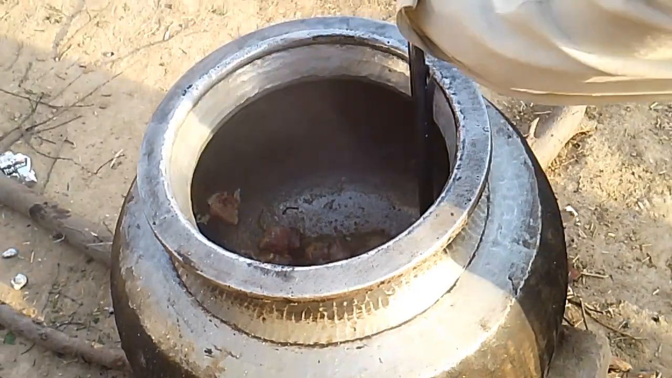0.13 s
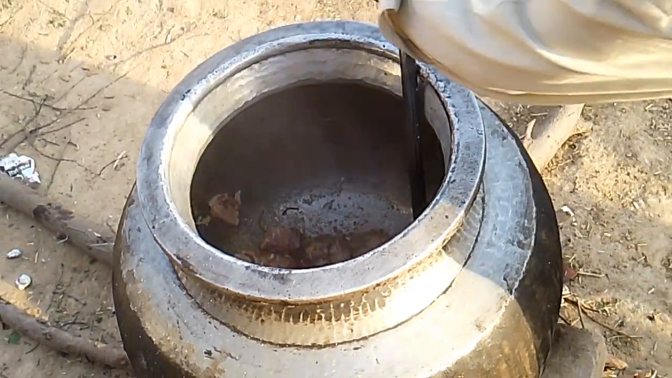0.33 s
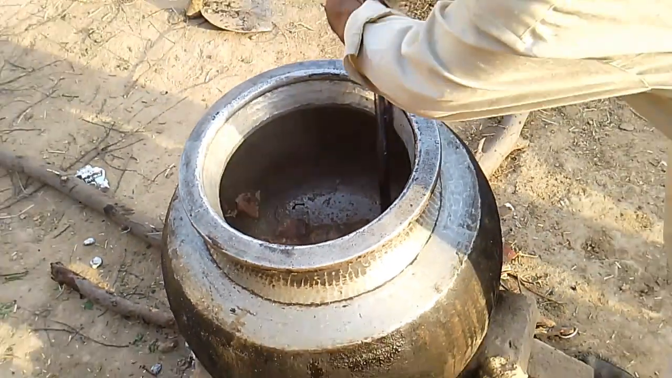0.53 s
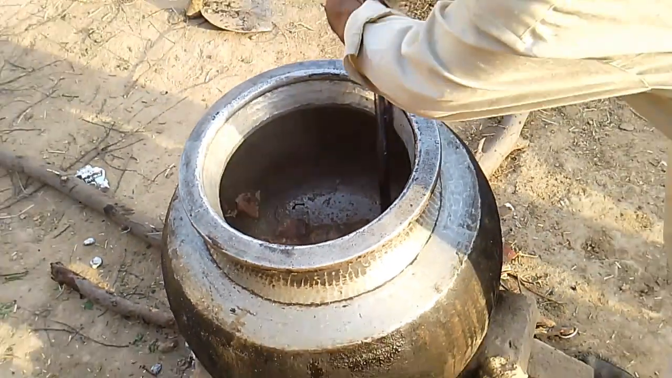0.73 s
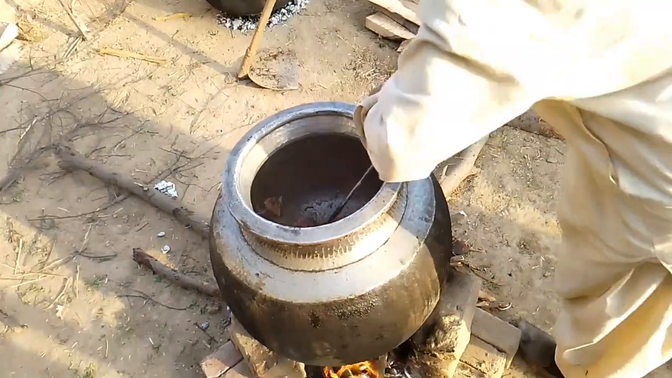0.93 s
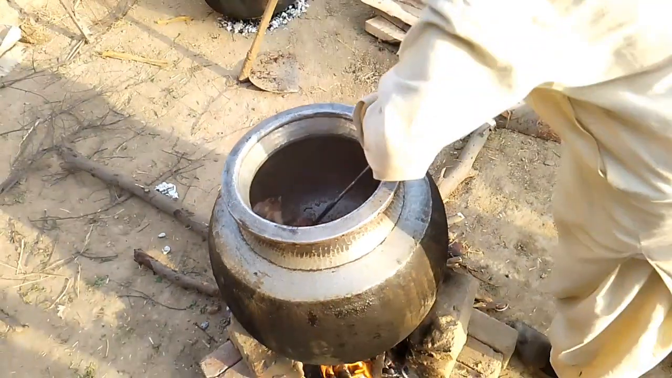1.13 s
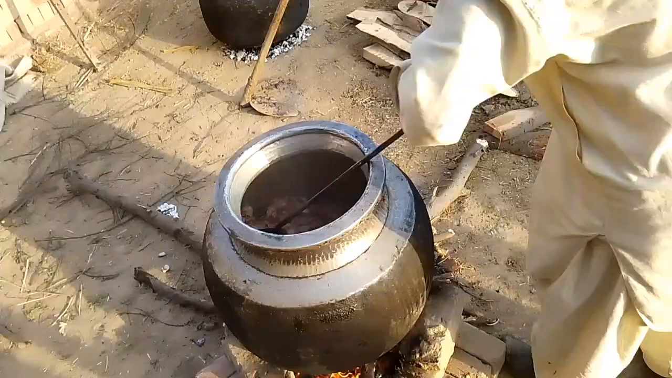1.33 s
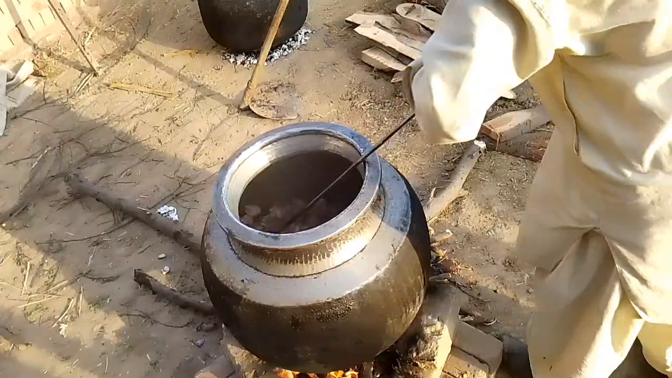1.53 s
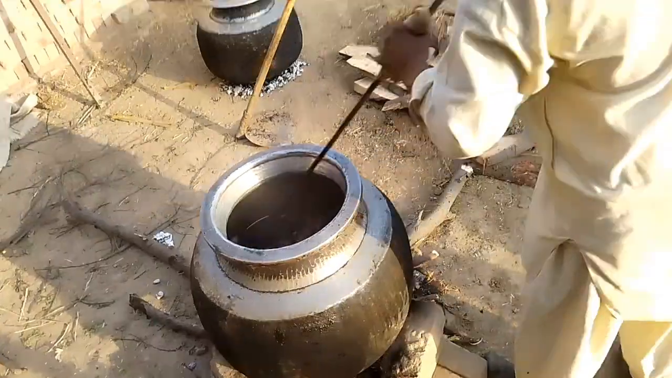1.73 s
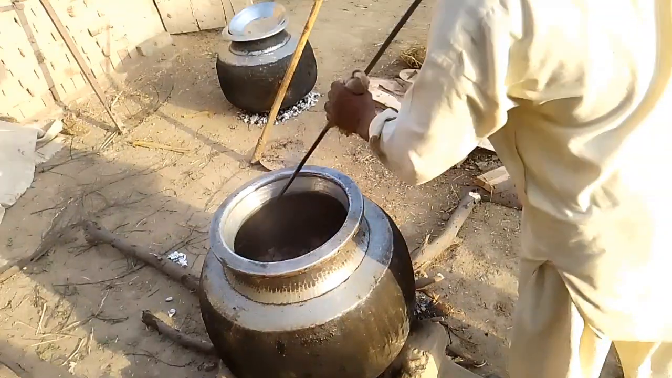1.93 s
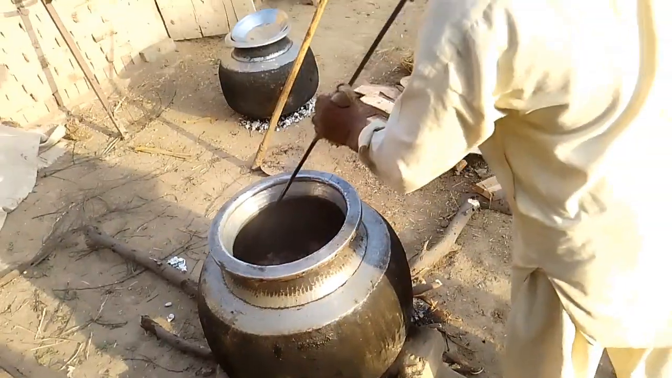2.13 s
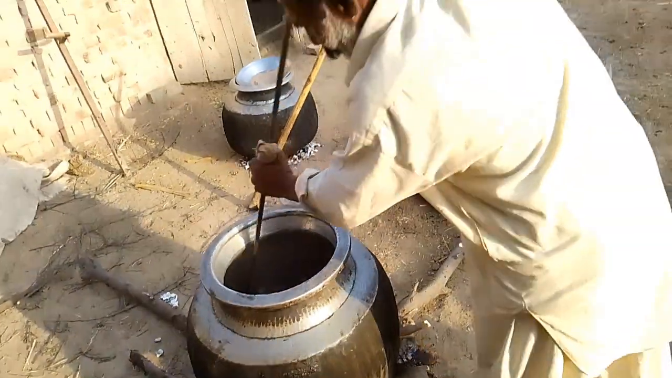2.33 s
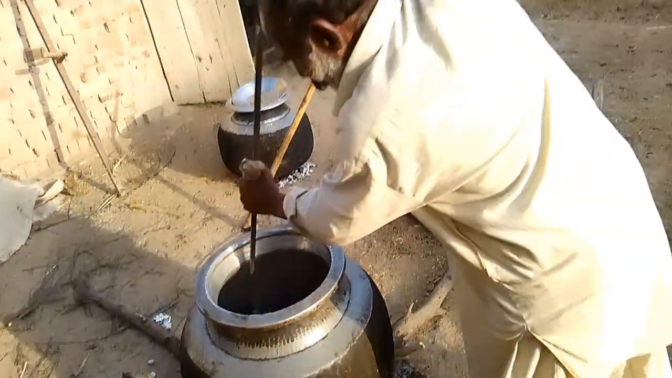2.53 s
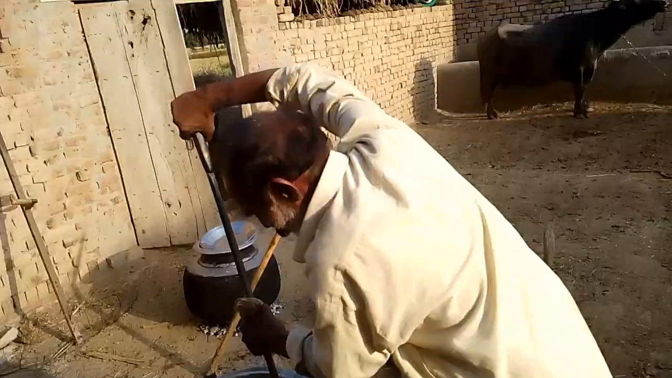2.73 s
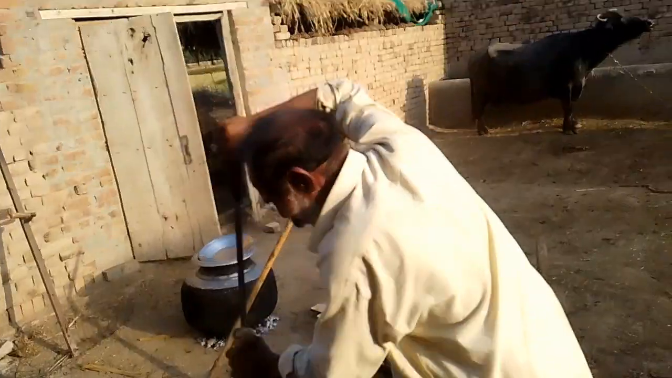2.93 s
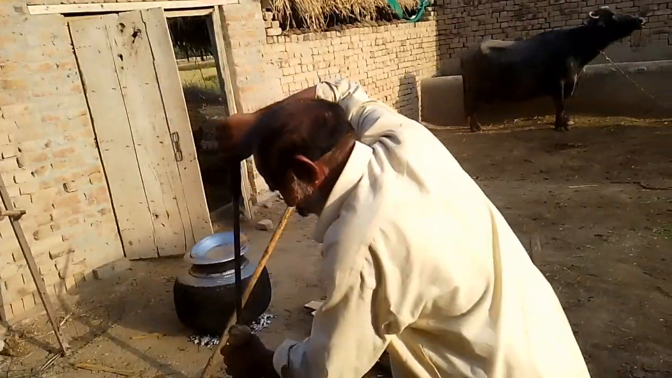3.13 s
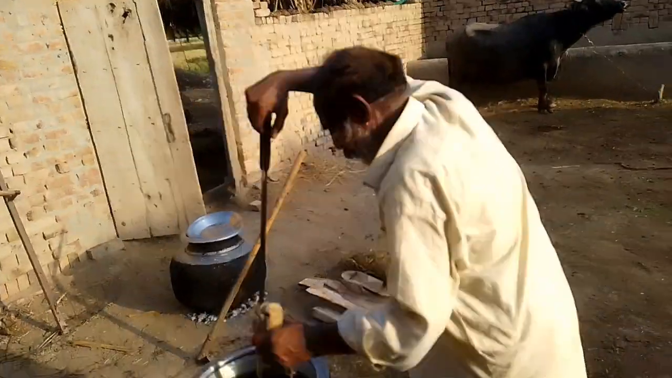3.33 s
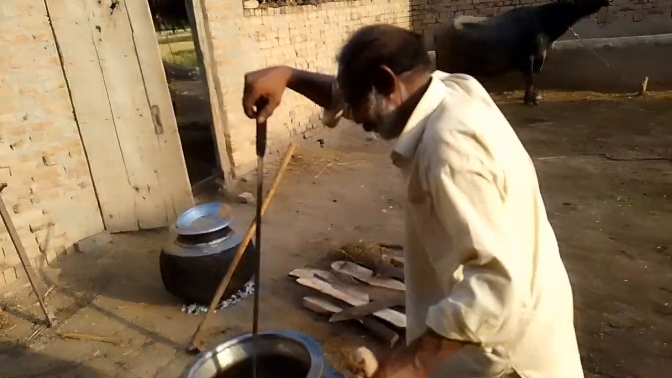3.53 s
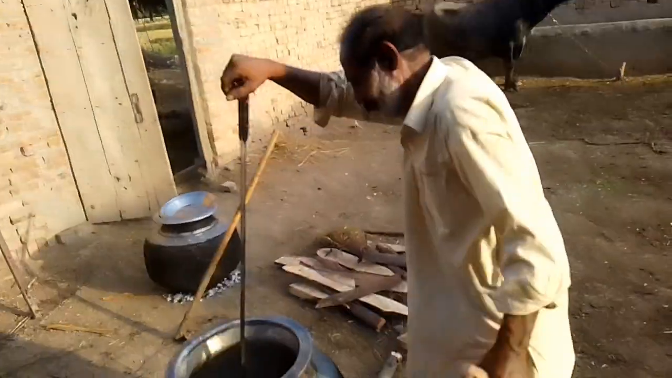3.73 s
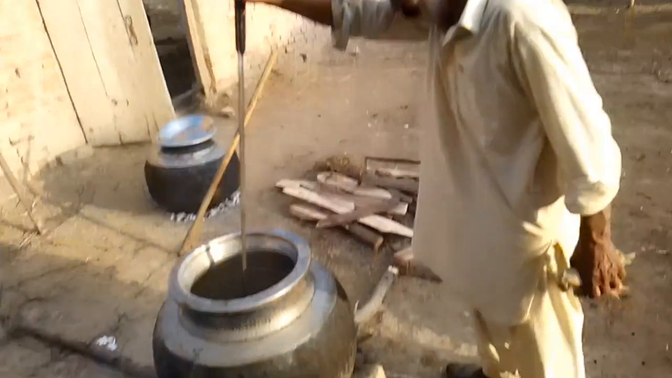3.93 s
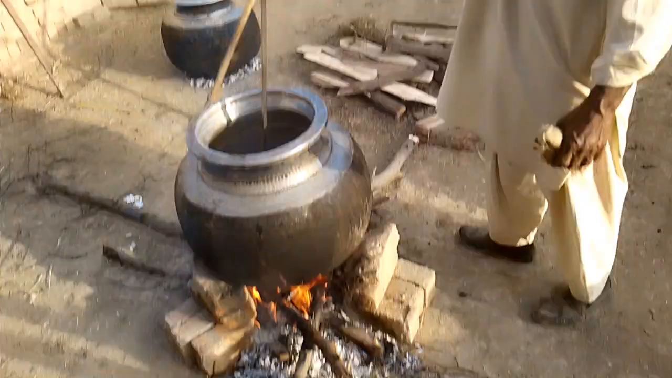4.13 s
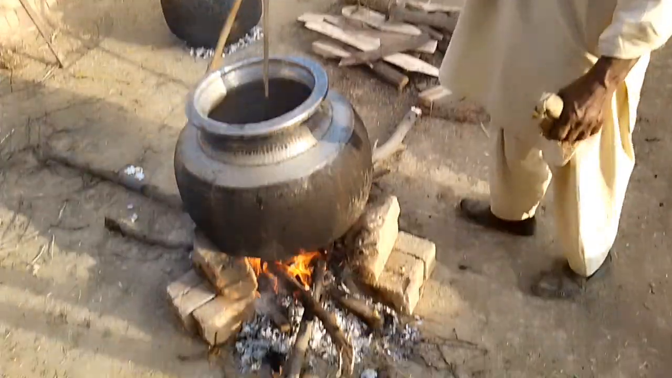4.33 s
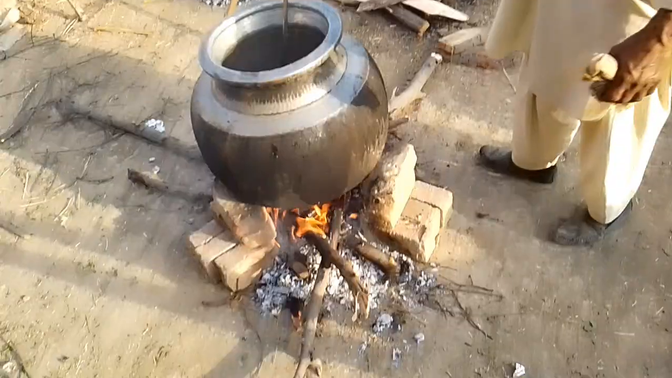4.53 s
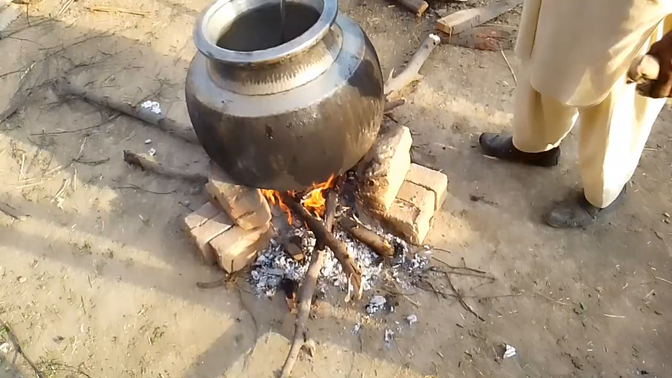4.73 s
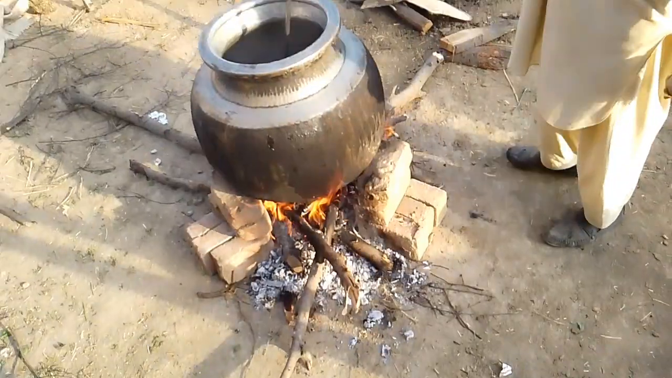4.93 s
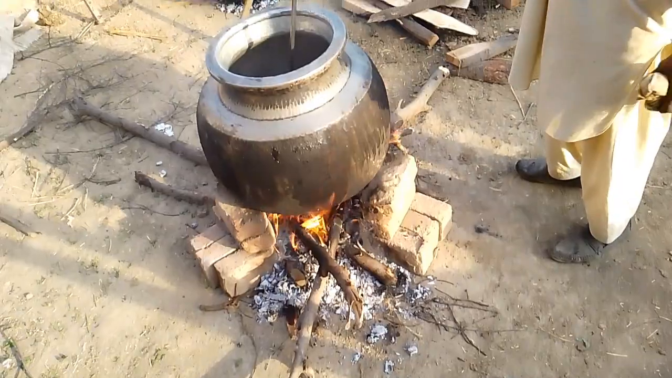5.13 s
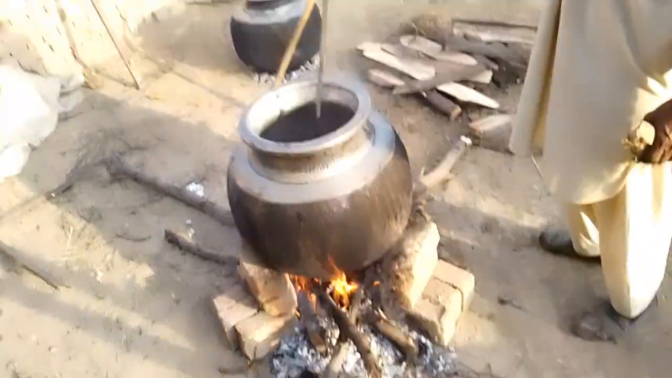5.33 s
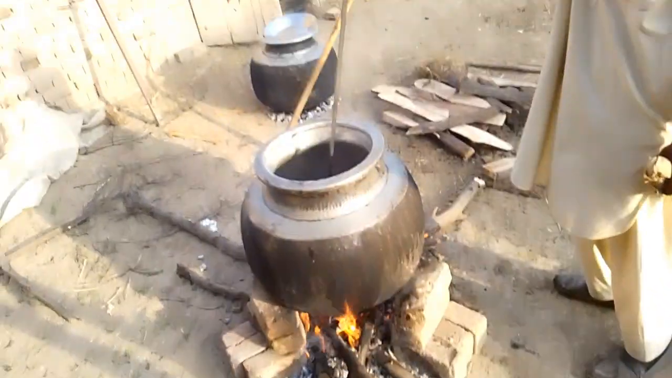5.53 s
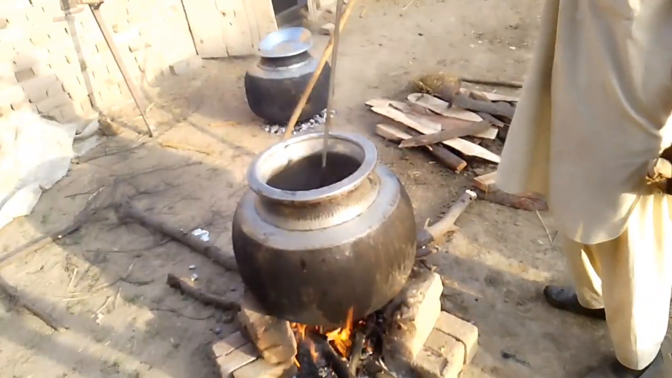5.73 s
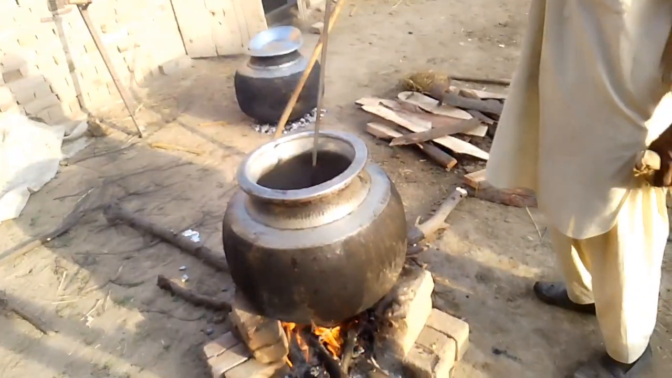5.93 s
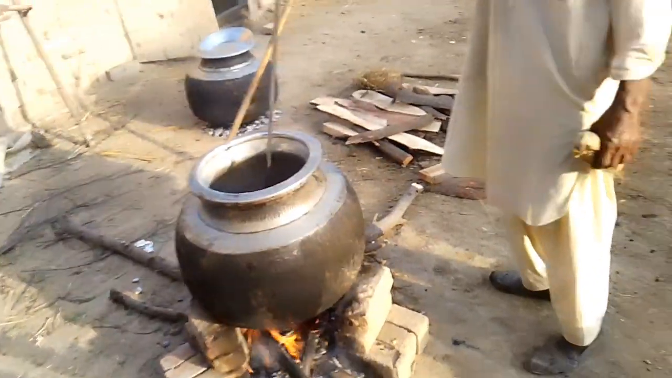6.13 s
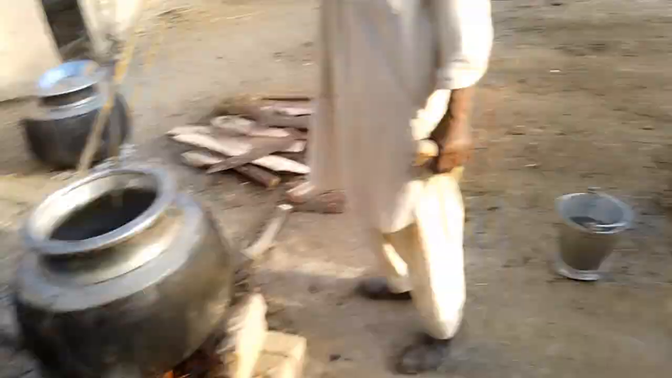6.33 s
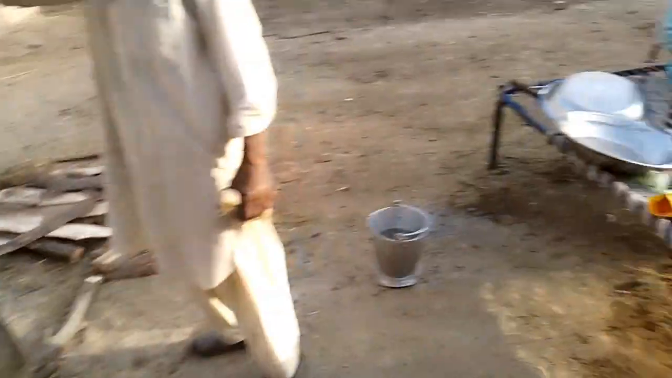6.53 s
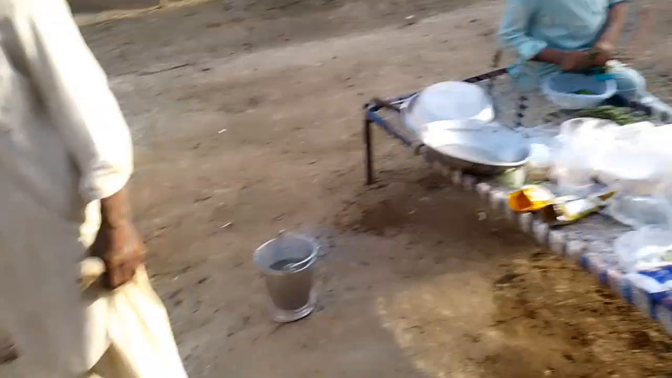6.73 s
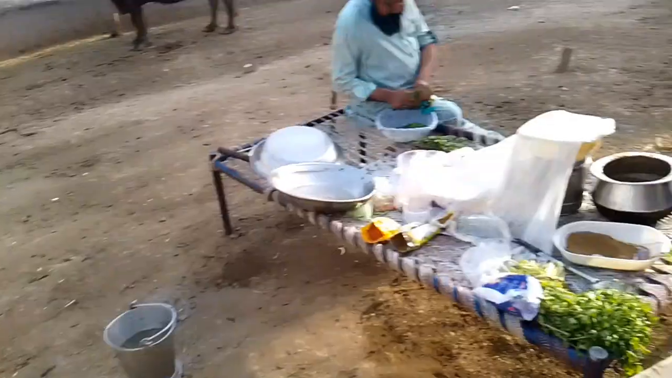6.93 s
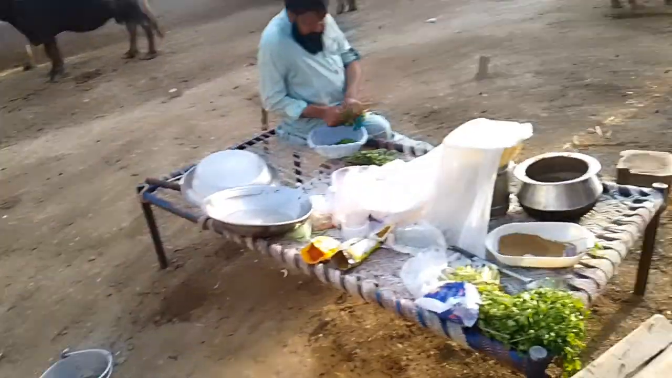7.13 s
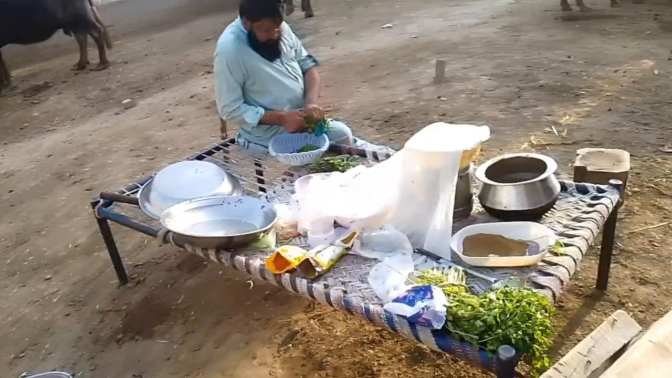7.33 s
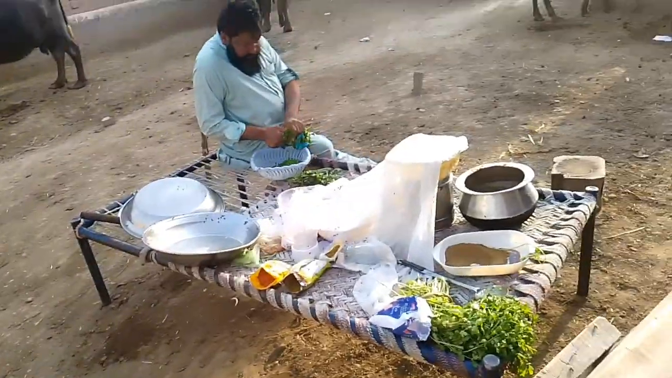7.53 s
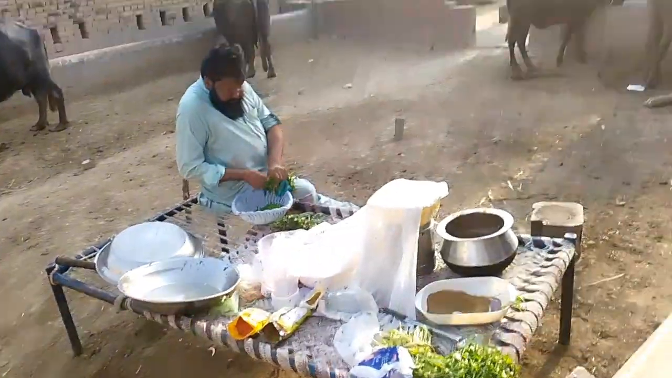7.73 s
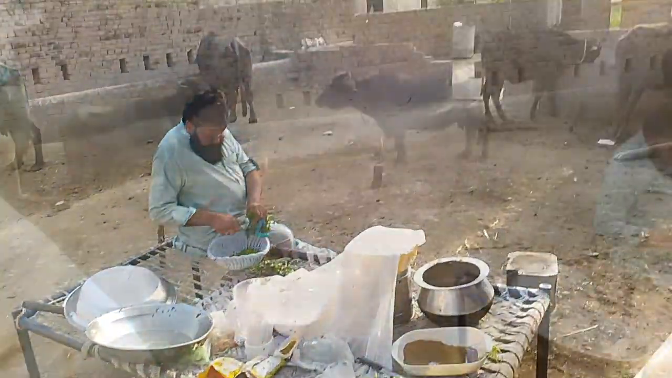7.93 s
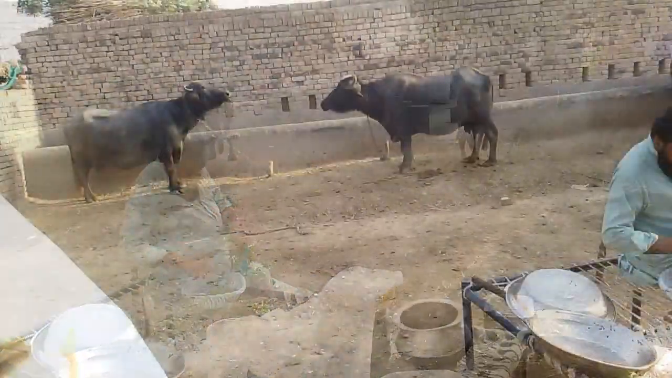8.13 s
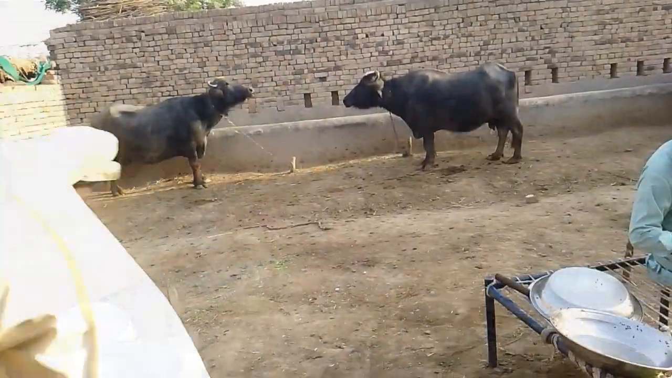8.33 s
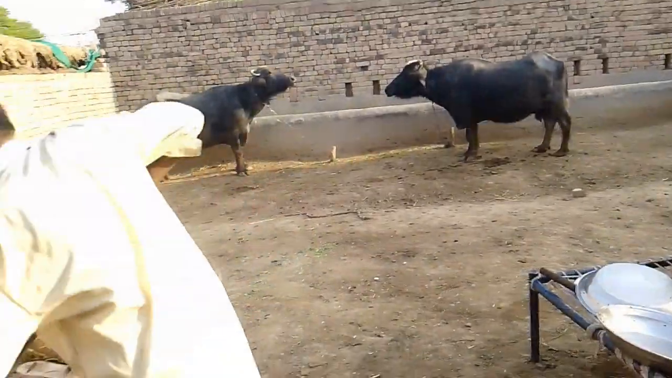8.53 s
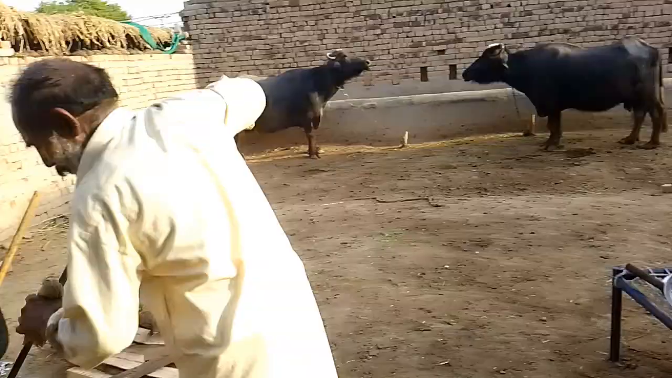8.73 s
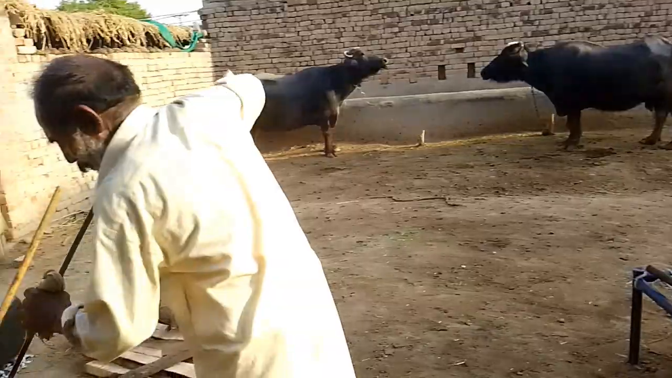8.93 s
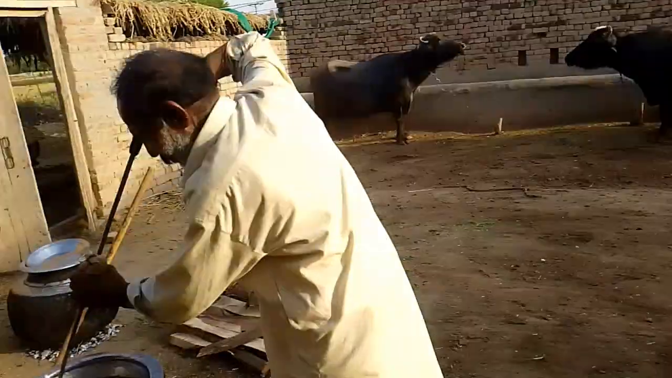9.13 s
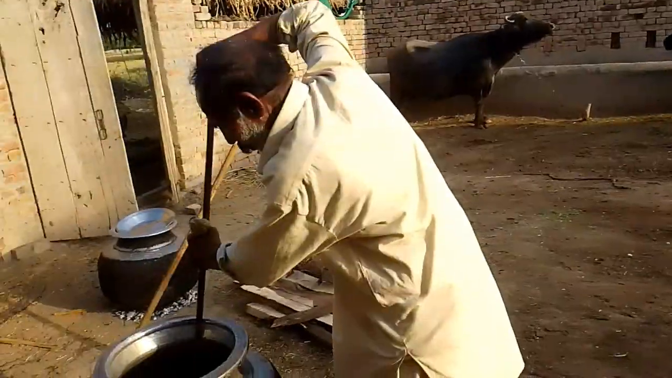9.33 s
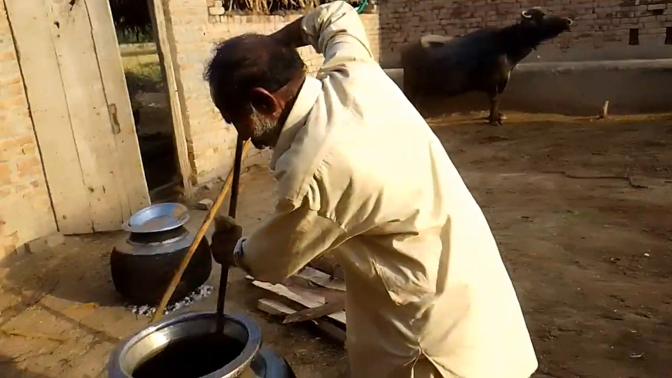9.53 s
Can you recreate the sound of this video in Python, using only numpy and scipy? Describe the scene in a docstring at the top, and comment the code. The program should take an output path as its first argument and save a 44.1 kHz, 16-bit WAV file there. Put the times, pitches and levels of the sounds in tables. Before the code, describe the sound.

A heavy metal pot of curry sizzles over a fire in an open yard, heard close, its frying hiss changing colour as the microphone moves. From about 0.6 to 1.4 seconds an iron ladle taps rapidly and scrapes the inside wall with gritty rasps and a hollow hum. A faint crow caws at 1.6. At 1.9 comes the loudest, bright ringing clank, followed by scraping; duller knocks and a squeaky scrape run around 2.5 to 3, fading by 3.5. Then mostly softer sizzle, with tiny fat spits and a low murmur. Distant hoarse caws come at 6.2 and 7.1, soft footfalls near 6.8 and 7.5, a sharper spit at 7.55 and a barely audible dove purr at 7.65. From 7.5 everything fades almost to silence; at 8.7 the sizzle returns abruptly, with ladle knocks and scrapes from 9, strongest around 9.3 to 9.5.

```python
"""A yard with a fire: in a big metal pot, curry sizzles while an iron ladle knocks and scrapes.
Knocks are sums of decaying modes with noise bursts; scraping is flickering noise, chirps and modal ringing.
The sizzle is noise recoloured as the listener wanders round the pot; noise makes spits, footfalls and murmur.
A crow caws far off by shaped overtones, and a dove purrs once on a sine.
The sound fades almost to silence, then returns at once."""
import sys
import numpy as np
from scipy import signal
from scipy.fft import rfft, irfft, next_fast_len
from scipy.io import wavfile
from scipy.ndimage import uniform_filter1d, map_coordinates

SR = 44100
rng = np.random.default_rng(int(sys.argv[2]) if len(sys.argv) > 2 else 0)


def dump(signal):
    """Clip the signal to [-1, 1] and save it as 16-bit WAV at the path in sys.argv[1]."""
    limited = np.clip(np.atleast_2d(signal).T, -1, 1)
    pcm = np.round(limited * 32767).astype(np.int16)
    wavfile.write(sys.argv[1], SR, pcm)


N = 422037

# ladle knocks: start_s, level_db, thud_db, lowest_mode_db, best_rung_pitch_hz, low_modes_db, damping (1 = free)
KNOCKS = [(0.567, -21, -31.5, -32.5, 1370, -5, 2.7), (0.746, -22, -51, -52, 1340, -1.5, 0.92),
          (0.773, -19, -59, -56, 1000, -8, 2.6), (0.864, -22, -40, -53, 1100, -7, 1.7),
          (0.948, -21.5, -42, -38, 1485, 1, 0.38), (1.038, -28, -55, -37, 1400, 14, 0.69),
          (1.079, -21, -59, -34.5, 980, -1, 2), (1.139, -20.5, -55, -34.5, 2150, -13, 1.1),
          (1.21, -20.5, -46, -34.5, 1390, 0, 1.1), (1.279, -24, -56, -37.5, 990, -3.5, 0.8),
          (1.36, -23, -64, -42, 1390, -5, 0.9), (1.871, -6, -60, -40, 1610, -5, 1.34),
          (1.924, -12, -59, -33.5, 1370, 0, 0.78), (1.954, -22, -59, -35.5, 1160, -6, 0.82),
          (2.098, -30, -63, -37.5, 2560, -18, 0.83), (2.474, -28.5, -45, -47, 1980, -24, 0.35),
          (2.559, -23.5, -42, -58, 2900, -17, 2.8), (2.597, -23, -31, -58, 1130, -13, 1.9),
          (2.65, -21, -34, -43, 1960, -22, 2.6), (2.688, -29, -39.5, -42.5, 1980, -18, 2),
          (2.961, -27, -42, -57, 1980, -22.5, 0.67), (8.995, -17.5, -54.5, -50, 2170, -16, 2.5),
          (9.172, -21, -51, -71.5, 2600, -13, 1.3), (9.23, -32, -61.5, -70, 1500, -19, 1.2),
          (9.273, -10, -63, -38, 1610, -7, 1.03), (9.316, -18, -46.5, -44, 1470, -6, 0.85),
          (9.447, -13, -62, -38, 1470, -36, 1.2), (9.478, -18, -49, -46.5, 1510, -30, 0.95),
          (9.551, -21.5, -58, -61, 1500, -24, 0.98)]
# ringing modes of the pot: pitch_hz, level_db, free_t60_s
POT_MODES = [(692, -1, 0.16), (1032, 9, 0.43), (1090, -13.5, 0.52), (1119, 7.5, 0.47), (1410, 0.5, 0.31),
             (1500, -5, .25), (1567, -0.5, 0.11), (1640, 2, 0.22), (1820, -16.5, 0.16), (2030, -12, 0.24),
             (1978, -6.5, 0.39), (2137, -5.5, 0.5), (2317, 1, 0.12), (2440, -5.5, 0.44), (2560, -3.5, 0.38),
             (2620, -13.5, 0.26), (2706, 0, .6), (2776, -12, 0.72), (2945, 1, 0.18), (3220, -7, 0.65),
             (3580, -2, 0.59), (3650, -10, .5), (3930, -23, 0.48), (4000, -22, 0.45), (4160, -3, 0.3),
             (4650, -23, 0.52), (5160, -31.5, .4), (5070, -19, .3)]
# loaded bottom of the pot, lowest mode first: pitch_hz, level_db, t60_s
BOTTOM_MODES = [(122.5, 0.5, 0.32), (235, 9, 0.042), (450.6, -5.5, 0.14)]
# ladle strokes, one list for each run of scraping: time_s, scrape_db, dull_rasp_db, low_grind_db
STROKES = [
    [(0.6, -41, -43, -55), (0.72, -48.5, -52, -67), (0.908, -30.5, -38.5, -45.5), (1.028, -30, -39, -51),
     (1.09, -30, -38, -53.5), (1.216, -31, -43.5, -45), (1.348, -64, -54, -64), (1.5, -39.5, -69, -67)],
    [(1.88, -36.5, -47, -77), (2.032, -35.5, -62, -63), (2.19, -41.5, -68, -64), (2.27, -45, -64, -59)],
    [(2.4, -44, -62, -49.5), (2.472, -40.5, -62, -59), (2.574, -35.5, -57, -50), (2.674, -26, -47, -67),
     (2.792, -41, -66, -50), (2.928, -35.5, -55, -58.5), (3.124, -51, -63, -52.5),
     (3.288, -58.5, -55.5, -51.5), (3.4, -46.5, -77, -79)],
    [(9.0, -41.5, -55, -70), (9.196, -32, -58, -64), (9.294, -46, -47, -52), (9.438, -34.5, -43, -52),
     (9.57, -35.5, -47.5, -50)],
]
# spectrum of iron on the wall: frequency_hz, density_db (per Hz)
SCRAPE_SPECTRUM = [(240, -23), (400, 14), (519, -2.5), (749, 2), (809, 5), (1020, -2), (1240, -5),
                   (1450, -25), (1760, -10), (4350, -8.5), (5730, -27), (9210, -10), (15500, -52)]
# spectrum of the low grind through the wall: frequency_hz, density_db (per Hz)
GRIND_SPECTRUM = [(53, -54.5), (90, -33), (118, -15), (161, -11), (226, -5), (300, -5.5), (333, 0.5),
                  (364, -20), (407, -18), (460, -7.5), (511, -47), (620, -14), (810, -56), (1360, -120)]
# level of the sizzle as the listener moves: time_s, body_db, fizz_db
SIZZLE_LEVELS = [(0.0, -45.5, -49.5), (0.55, -44, -50), (1.1, -41.5, -46.5), (1.6, -43, -47),
                 (2.0, -40.5, -53.5), (2.4, -46.5, -51), (2.85, -45, -47), (3.0, -42, -55.5),
                 (3.35, -45, -52.5), (3.78, -47.5, -53), (4.6, -50.5, -58), (5.2, -51, -55),
                 (5.8, -48, -57), (6.39, -48.5, -53), (6.57, -53, -56.5), (6.94, -50, -57.5),
                 (7.35, -49, -52.5), (7.91, -44, -47), (8.06, -44, -46.5), (8.2, -48.5, -54),
                 (8.45, -45.5, -47), (8.67, -49, -53.5), (8.68, -44.5, -46), (8.97, -42.5, -47.5)]
# colour of the sizzle at each listening place: time_s, list of (frequency_hz, density_db (per Hz))
SIZZLE_COLOURS = [(0.3, [(290, -51), (500, -36), (586, -55), (696, 3), (863, -2), (1510, 1), (1700, -8),
                  (1880, -7), (2010, -8), (2500, -2), (2840, -2), (4840, 3), (7780, -11.5), (9930, -10),
                  (15500, -24)]), (2.2, [(290, -46), (500, -21), (603, -55), (666, -45), (696, -26),
                  (1030, -9), (1330, -22), (1770, 3.5), (2260, -15), (2610, -6), (3430, -7.5), (4440, -4.5),
                  (5670, -7.5), (8720, -7), (15500, -18)]), (3.6, [(290, -26), (500, -19), (781, -47),
                  (901, -17), (1030, -12), (1410, -18), (1470, -17), (1580, -13), (1820, 0.5),
                  (3380, -11.5), (3630, -8), (6270, -20), (8480, -20.5), (11000, -33.5), (15500, -29.5)]),
                  (5.2, [(290, -56), (500, -27), (803, -18), (914, -37), (1010, -8), (1240, -16), (1600, 3),
                  (2010, -3), (2290, 3.5), (2800, -1.5), (3960, -0.5), (7030, -17), (8720, -13.5),
                  (11300, -28), (15500, -27.5)]), (6.8, [(290, -34), (500, -15.5), (968, -11.5), (1100, -7),
                  (1370, -14), (1990, -7.5), (2390, -10.5), (2890, -4.5), (4020, -4.5), (5130, -6),
                  (6180, -4), (7670, -9), (9790, -6.5), (11500, -17), (15500, -11.5)]), (7.8, [(290, -60),
                  (500, -26), (803, -10), (982, -27), (1120, -10), (1620, -9), (1770, -6), (2970, -2),
                  (3790, -6), (4130, -1), (5670, -12), (6270, -8), (8980, -4), (10400, -18),
                  (15500, -24.5)]), (8.8, [(290, -38), (500, -25), (577, -33), (648, -25), (716, -22),
                  (851, -14.5), (1240, -17.5), (1580, -6), (3100, -10), (4130, -6), (4840, -11.5),
                  (6930, -15), (8980, -9.5), (12000, -20), (15500, -17)])]
# resonances of the air in the pot's neck: centre_hz, width_hz, lift_db
NECK_RESONANCES = [(1630, 110, 4.5), (2313, 520, 5), (3800, 220, 1.5)]
# fat spits: start_s, level_db
SPITS = [(3.3034, -47), (3.3583, -51), (3.3942, -52), (3.4705, -48), (4.2234, -45), (5.1564, -47),
         (5.3198, -44), (7.5552, -34)]
# soft footfalls: start_s, level_db
FOOTFALLS = [(6.817, -40), (6.884, -47.5), (7.463, -49)]
# crow caws: start_s, length_s, level_db, lower_over_upper_beak_resonance_db
CAWS = [(1.6, 0.2, -43.5, 3.5), (6.187, 0.28, -46, 0), (7.129, 0.24, -42.5, -5.5)]
# weak fixed resonances of the crow's beak: centre_hz, width_hz, level_db
BEAK_RESONANCES = [(960, 200, -24), (3900, 400, -16)]
# dove throbs: start_s, peak_db
PURR_THROBS = [(7.644, -46.5), (7.668, -52), (7.69, -49), (7.715, -58), (7.745, -49)]
# spectrum of the far murmur of fire and yard: frequency_hz, density_db (per Hz)
MURMUR_SPECTRUM = [(12, -44), (20, -14), (22, -24), (76, -28), (169, -7), (728, -11.5), (812, -5.5),
                   (905, -13.5), (1010, -10.5), (1230, -17.5), (1500, -3), (1950, -24), (3300, -120)]
# decay of the yard's echo: frequency_hz, t60_s
ECHO_DECAY = [(200, 1), (2000, 0.33), (10000, 0.18)]

# knocks: parts of a blow in dB relative to its level, decay times in s
CLANK_DB, CLANK_T60_S = -13.5, 0.053
CRACK_DB, CRACK_T60_S = -15, 0.091
SMACK_DB, SMACK_T60_S = -14, 0.032
SMACK_GROWS = 0.4  # dB more of deep smack for each dB of blow
HIGH_DB, HIGH_DB_PER_OCTAVE = -13.5, 57  # high modes of a blow pitched at 1400 Hz; brighter blows ring them more
ATTACK_S, ATTACK_SOFTENS = 0.00035, 0.63  # rise of a -3 dB blow; lighter blows rise slower (dB of time per dB)
THUD_DEEPENS = 0.38  # heavier thuds stir the lowest bottom mode more (dB per dB)

# the pot's lowest mode
BELLY_HZ, BELLY_T60_S, BELLY_RISE_S = 365, 1.8, 0.013  # t60 at damping 1; time to rise to 95 %
BELLY_RUBBED_DB = -18  # what scraping feeds it
BELLY_STEADY_DB, BELLY_WAVERS = -40, 0.4  # below this level the hum dips, more for each dB it has sunk
REST_S, REST_DB = 3.54, -68  # the ladle comes to rest and stills the hum
RETURN_S, BELLY_RETURN_DB = 8.675, -55  # when full level returns, and the hum set there

HISS_DB, TREBLE_DB, CHIRP_DB = -6, -18.5, -10.5  # over the scrape level
RING_DB = -8  # the pot's modes under the scrape

# crow
CAW_PULSES_PER_S, RASP = 71, 0.17
CAW_ATTACK_S, CAW_RELEASE_S, CAW_EDGE_DB, CAW_TIRES_DB_PER_S = 0.081, 0.1, -15.5, 23
BEAK_SHUT_HZ, BEAK_OPEN_HZ, BEAK_SAG_HZ_PER_S, LOWER_FADES_DB_PER_S = 1800, 1946, 600, 43

SCUFF_DB = -2  # grit under a footfall
FADE_S, BEFORE_RETURN_DB = 7.54, 2  # start of the linear fade; gain ahead of it
LOW_CUT_HZ, TOP_HZ = 93, 15650


def amp(db):
    """Decibel law: amplitude is ten to the power dB / 20."""
    return 10 ** (np.asarray(db) / 20)


def unit(x):
    """Normalisation to an rms of one."""
    return x / np.sqrt(np.mean(x ** 2) + 1e-20)


def along(points, hz):
    """Interpolation of (frequency, value) points on a logarithmic frequency axis."""
    f, v = np.transpose(points)
    return np.interp(np.log(hz + 1), np.log(f + 1), v)


def curves(tables, silent_db=None):
    """Linear interpolation of each column in time; given silent_db, the gaps between tables drop to it."""
    rows = []
    for table in tables:
        if silent_db is None:
            rows += table
            continue
        silence = (silent_db,) * (len(table[0]) - 1)
        before = (table[0][0] - 0.02,) + silence
        after = (table[-1][0] + 0.05,) + silence
        rows += [before, *table, after]
    s, *columns = np.transpose(rows)
    return [np.interp(np.arange(N) / SR, s, column) for column in columns]


def wobble(rate):
    """Spline interpolation of random knots, rate of them a second, into a smooth curve."""
    knots = rng.standard_normal(int(N * rate / SR) + 4)
    return map_coordinates(knots, [np.arange(N) * rate / SR])


def filtered(x, response):
    """Linear filtering: the spectrum times a complex response of frequency."""
    m = next_fast_len(N + SR)
    return irfft(rfft(x, m) * response(np.fft.rfftfreq(m, 1 / SR)), m)[:N]


def highs_above(hz, edge_hz):
    """Smooth high-pass weight, one half at the edge."""
    return 1 / (1 + (edge_hz / (hz + 1)) ** 8)


def resonances(modes):
    """Modal superposition: causal second-order (Hz, width, dB) resonances of alternating sign."""
    def response(f):
        total = 0
        for k, (centre, width, db) in enumerate(modes):
            damping = 1j * f * width
            total = total + (-1) ** k * amp(db) * damping / (centre * centre - f * f + damping)
        return total
    return response


def gritty(spiky_db, rate):
    """Amplitude modulation of noise: its level flickers fast, as many small bursts do."""
    return unit(rng.standard_normal(N) * amp(spiky_db * wobble(rate)))


def grains(count, pitch_hz, spread, cycles, spiky_db, times):
    """Granular superposition: short damped notes at random moments drawn from times, rms 1 there."""
    u, k = rng.random((count, 4)), np.arange(400)
    start = times[(u[:, :1] * len(times)).astype(int)]
    cycles_per_sample = pitch_hz * np.exp(spread * (u[:, 1:2] + u[:, 2:3] - 1)) / SR
    size = amp(-spiky_db * np.log(u[:, 3:] + 0.0088))
    notes = size * np.exp(-k * cycles_per_sample / cycles) * np.sin(2 * np.pi * cycles_per_sample * k)
    out = np.bincount((start + k).ravel(), notes.ravel(), N + len(k))[:N]
    return out / np.sqrt(np.mean(out[times] ** 2))


def bandpass(low_hz, high_hz):
    """Second-order Butterworth band, as filter sections."""
    return signal.butter(2, [low_hz, high_hz], "bandpass", fs=SR, output="sos")


def puffs(events, low_hz, high_hz, t60):
    """Exponential decay of band-limited noise: one short burst for each event."""
    out, t = np.zeros(N + SR), np.arange(SR // 4) / SR
    for s, db in events:
        out[round(s * SR):][:len(t)] += amp(db - 60 * t / t60) * rng.standard_normal(len(t))
    bandwidth_gain = np.sqrt(SR / 2 / (high_hz - low_hz)) / 2
    return signal.sosfilt(bandpass(low_hz, high_hz), out[:N]) * bandwidth_gain


def pot_ring(t, best_hz, low_db, damping):
    """Modal decay: a blow favours modes near its pitch; the chattering ladle roughens them."""
    hz, level_db, t60 = np.transpose(POT_MODES)[:, :, None]
    luck = rng.standard_normal((len(POT_MODES), 3))
    knots = rng.standard_normal((len(POT_MODES), 32))
    high_db = min(HIGH_DB + HIGH_DB_PER_OCTAVE * np.log2(best_hz / 1400), -5)
    favour_db = 9 * np.exp(-(np.log2(hz / best_hz) / 0.13) ** 2)
    favour_db = favour_db + np.where(hz < 1250, low_db, 0) + np.where(hz > 2600, high_db, 0)
    chatter = np.array([np.interp(t * 60, np.arange(32), row) for row in knots])
    waver_db = np.clip(1.5 * hz / 1000, 0, 5) * chatter  # higher modes flutter more
    scatter_db = 1.7 * luck[:, :1]
    gains = amp(level_db + favour_db + scatter_db + waver_db - 60 * t * damping / t60)
    detuned_hz = hz * (1 + 0.00337 * luck[:, 1:2])
    ring = np.sum(gains * np.sin(2 * np.pi * detuned_hz * t + 3 * luck[:, 2:]), axis=0)
    return 0.66 * ring / np.max(np.abs(ring))


def knocks():
    """Impact excitation: each blow rings the pot, clanks near its own pitch, cracks, smacks and thuds."""
    out, t = np.zeros(N + SR), np.arange(SR // 2) / SR
    wide, deep = bandpass(1400, 5600), bandpass(120, 900)
    bottom = np.array([amp(db - 60 * t / t60) * np.sin(2 * np.pi * hz * t) for hz, db, t60 in BOTTOM_MODES])
    bottom = (1 - np.exp(-t / 0.0018)) * bottom
    for s, db, thud_db, _, best_hz, low_db, damping in KNOCKS:
        ring = pot_ring(t, best_hz, low_db, damping)
        narrow = bandpass(best_hz / 1.28, best_hz * 1.36)
        noise = rng.standard_normal((3, len(t)))
        clank = unit(signal.sosfilt(narrow, noise[0])) * amp(CLANK_DB - 60 * t / CLANK_T60_S)
        crack = unit(signal.sosfilt(wide, signal.sosfilt(wide, noise[1])))
        crack = crack * amp(CRACK_DB - 60 * t / CRACK_T60_S)
        smack_db = SMACK_DB + SMACK_GROWS * (db - 6.5)
        smack = unit(signal.sosfilt(deep, noise[2])) * amp(smack_db - 60 * t / SMACK_T60_S)
        attack_s = ATTACK_S * amp(ATTACK_SOFTENS * (-3 - db))
        blow = (ring + clank + crack + smack) * (1 - np.exp(-t / attack_s))
        thud = bottom[1:].sum(0) + amp(THUD_DEEPENS * (thud_db + 21)) * bottom[0]
        out[round(s * SR):][:len(t)] += amp(db) * blow + amp(thud_db) * thud
    return out[:N]


def belly():
    """Free and driven vibration: each blow resets the lowest mode's swing, and scraping feeds it."""
    t = np.arange(N) / SR
    settings = [(0, -120, 1), (REST_S, REST_DB, 1), (RETURN_S, BELLY_RETURN_DB, 0.3)]
    settings += [(knock[0], knock[3], knock[6]) for knock in KNOCKS]
    s, db, damping = np.transpose(sorted(settings))
    last = np.searchsorted(s, t, "right") - 1
    free_db = db[last] - 60 * (t - s[last]) * damping[last] / BELLY_T60_S
    sunk_db = np.clip(BELLY_STEADY_DB - free_db, 0, 15)
    struck = amp(free_db - BELLY_WAVERS * sunk_db * wobble(12) ** 2)
    rubbed = amp(curves(STROKES, -100)[0] + BELLY_RUBBED_DB + 4.1 * wobble(12))
    rise = np.exp(-t[:SR // 4] / BELLY_RISE_S * 3)
    swing = signal.fftconvolve(np.hypot(struck, rubbed), rise / rise.sum())[:N]
    return np.sqrt(2) * swing * np.sin(2 * np.pi * BELLY_HZ * t + 0.2 * wobble(6))


def strokes():
    """Friction excitation: grit under the ladle hisses, chirps, rings the modes and grinds low in the wall."""
    bright_db, dull_db, grind_db = curves(STROKES, -100)
    # the wall's countless small modes
    shell = rng.standard_normal(SR // 8) * amp(-60 * np.arange(SR // 8) / SR / 0.06)
    force = unit(signal.fftconvolve(gritty(2.2, 90), shell)[:N])

    def band(low_hz, high_hz):
        def response(hz):
            edges = highs_above(hz, low_hz) * (1 - highs_above(hz, high_hz))
            return amp(along(SCRAPE_SPECTRUM, hz)) * edges
        return unit(filtered(force, response))

    rasp = amp(dull_db) * band(270, 1200)
    hiss = amp(bright_db + HISS_DB) * band(1260, 5300)
    treble = amp(bright_db + TREBLE_DB) * band(5300, 19000)
    scraping = np.flatnonzero(bright_db > -90)
    chirps = grains(count=3000, pitch_hz=2905, spread=0.8, cycles=19, spiky_db=6.5, times=scraping)
    modes = resonances([(hz, 1.7 / t60 + 9, db * 0.69) for hz, db, t60 in POT_MODES])
    push = force * (amp(dull_db) + 0.24 * amp(bright_db))
    ring = filtered(push, modes) / np.std(filtered(force, modes))
    grind = unit(filtered(gritty(2.5, 25), lambda hz: amp(along(GRIND_SPECTRUM, hz))))
    return rasp + hiss + treble + amp(bright_db + CHIRP_DB) * chirps + amp(RING_DB) * ring + amp(grind_db) * grind


def sizzle():
    """Bubble noise through a resonator: steam bursts in the fat, coloured by the neck and listening place."""
    body_db, fizz_db = curves([SIZZLE_LEVELS])
    bubbles = gritty(0.8, 300) * amp(0.9 * wobble(12))
    hz, t, z = signal.stft(bubbles, SR, nperseg=1024)
    shapes_db = np.array([along(points, hz) for s, points in SIZZLE_COLOURS])
    shapes_db += sum(db / (1 + ((hz - c) / w * 2) ** 2) for c, w, db in NECK_RESONANCES)
    place = np.interp(t, [s for s, points in SIZZLE_COLOURS], np.arange(len(SIZZLE_COLOURS)))
    colour = amp(map_coordinates(shapes_db, np.meshgrid(place, np.arange(len(hz))), order=1))

    def field(wide, long):
        """Random patches, smoothed over wide bins and long frames."""
        across = uniform_filter1d(rng.standard_normal(z.shape), wide, 0)
        return unit(uniform_filter1d(across, long, 1))

    def levelled(part, db):
        """Set each frame of a spectral part to its level."""
        frame = np.minimum(N - 1, (t * SR).astype(int))
        return part / np.sqrt(np.sum(part ** 2, axis=0) / len(hz)) * amp(db[frame])

    # broad patches, and the hollow pot's fine ripple
    drift_db = 1.1 * field(wide=12, long=8) + 2.2 * field(wide=2, long=14)
    high = highs_above(hz, 5500)[:, None]
    gain = levelled(colour * (1 - high), body_db) + levelled(colour * high, fizz_db)
    return signal.istft(z * gain * amp(drift_db), SR, nperseg=1024)[1][:N]


def fat_spits():
    """Impulsive release: each spit of fat is a short burst of mid-to-high noise."""
    return puffs(SPITS, 1690, 5400, 0.082)


def footfalls():
    """Soft impact: a low burst of noise for the foot, a higher one for the grit under it."""
    return puffs(FOOTFALLS, 183, 360, 0.22) + amp(SCUFF_DB) * puffs(FOOTFALLS, 1500, 3000, 0.1)


def crow():
    """Source and filter: overtones of slow throat pulses, shaped by beak resonances and roughened by rasp."""
    voice, jitter, rasp = np.zeros(N), wobble(30), wobble(110)
    overtone = np.arange(10, 62)[:, None]

    def peak(centre_hz, half_width_hz):
        return 1 / (1 + ((overtone * CAW_PULSES_PER_S - centre_hz) / half_width_hz) ** 4)

    for s, length, db, lower_db in CAWS:
        t = np.arange(round((length + CAW_RELEASE_S) * SR)) / SR
        span = slice(round(s * SR), round(s * SR) + len(t))
        opened = np.clip(t / CAW_ATTACK_S, 0, 1)
        held = np.maximum(t - CAW_ATTACK_S, 0)
        edge = np.maximum(1 - opened, (t - length) / CAW_RELEASE_S)
        upper_hz = BEAK_SHUT_HZ + (BEAK_OPEN_HZ - BEAK_SHUT_HZ) * opened - BEAK_SAG_HZ_PER_S * held
        upper = peak(upper_hz, 150)
        lower = amp(lower_db - LOWER_FADES_DB_PER_S * held) * peak(1497, 110)
        fixed_peaks = sum(amp(g) * peak(c, w / 2) for c, w, g in BEAK_RESONANCES)
        pulses = np.cumsum(CAW_PULSES_PER_S * (1 + 0.01175 * jitter[span])) / SR
        waves = np.cos(2 * np.pi * overtone * pulses + 0.16 * overtone ** 2)
        call = unit(np.sum((upper + lower + fixed_peaks) * waves, axis=0))
        voice[span] = amp(db - CAW_TIRES_DB_PER_S * held + CAW_EDGE_DB * edge) * call
    return voice * (1 + RASP * rasp)


def dove():
    """Amplitude modulation: one low note swells in a few soft throbs."""
    t = np.arange(N) / SR
    swell = sum(amp(db) * np.exp(-((t - s - 0.008) / 0.0068) ** 2) for s, db in PURR_THROBS)
    return swell * np.sin(2 * np.pi * 425 * t)


def yard_murmur():
    """Spectral shaping of noise: the far murmur of fire and yard, gently wavering."""
    murmur = unit(filtered(rng.standard_normal(N), lambda hz: amp(along(MURMUR_SPECTRUM, hz))))
    return amp(-61.5 + 0.5 * wobble(4.6)) * murmur


def walls(x):
    """Diffuse reverberation: each frequency of the yard's answer dies at its own speed."""
    hz, t, z = signal.stft(rng.standard_normal(SR // 2), SR, nperseg=256)
    tail = signal.istft(z * amp(-60 * t / along(ECHO_DECAY, hz)[:, None]), SR, nperseg=256)[1]
    delayed = np.pad(x, (700, 0))  # 16 ms
    return signal.fftconvolve(delayed, tail / np.linalg.norm(tail))[:N]


def scene():
    """Superposition: the sources add, and the yard answers the knocks and caws."""
    blows, caws = knocks(), crow()
    pot = blows + belly() + strokes() + sizzle() + fat_spits()
    echo = walls(amp(-17) * blows + amp(3.0) * caws)
    return (pot + footfalls() + caws + dove() + yard_murmur() + echo)[None]


def record(dry):
    """Band limitation: a microphone drops deep bass and adds noise; then the fade, return and treble limit."""
    high_pass = signal.butter(10, LOW_CUT_HZ, "highpass", fs=SR, output="sos")
    own_noise = unit(filtered(rng.standard_normal(N), lambda hz: 1 / (1 + (hz / 40) ** 2)))
    heard = signal.sosfilt(high_pass, dry[0]) + amp(-86) * own_noise
    t = np.arange(N) / SR
    fade = np.clip((RETURN_S + 0.009 - t) / (RETURN_S - FADE_S), 0, 1)
    gain = np.where(t < RETURN_S, amp(BEFORE_RETURN_DB) * fade, 1)
    return filtered(heard * gain, lambda hz: hz < TOP_HZ)[None]


dry = scene()
out = record(dry)
dump(out)
```